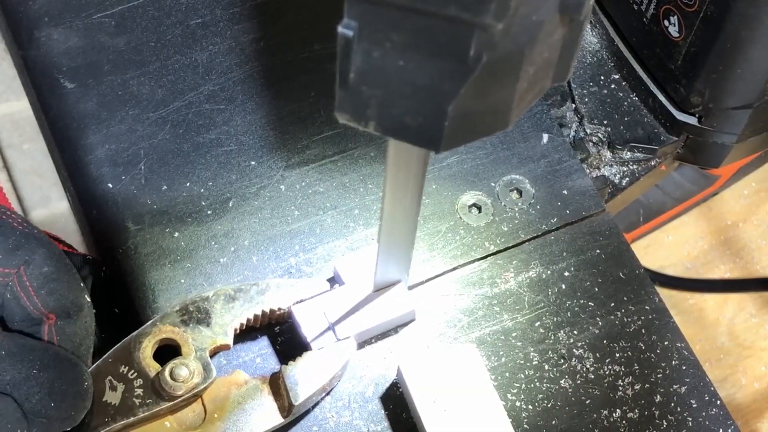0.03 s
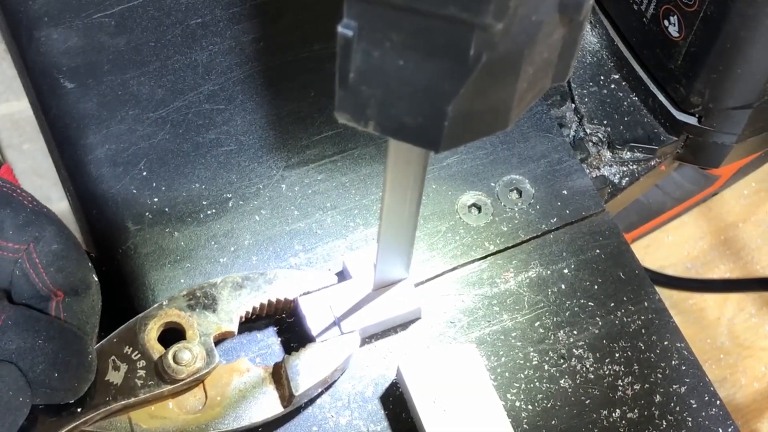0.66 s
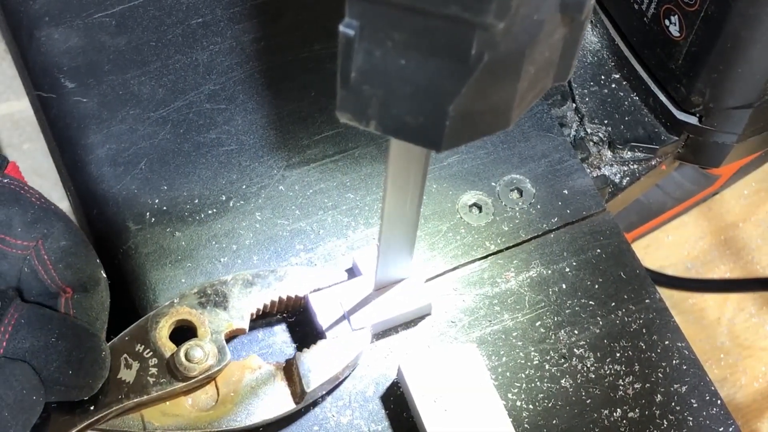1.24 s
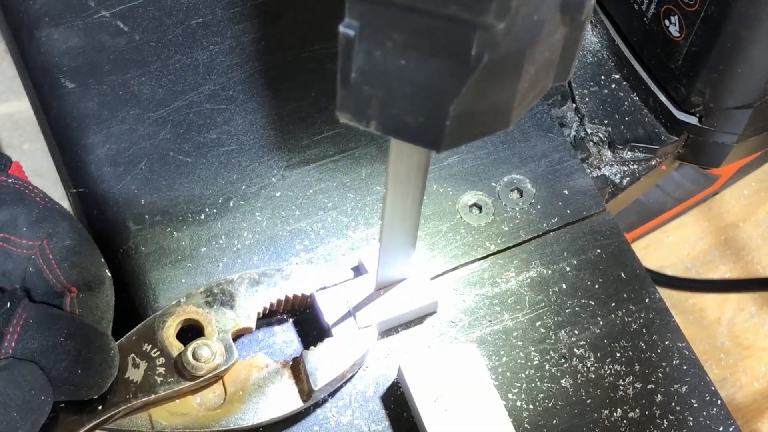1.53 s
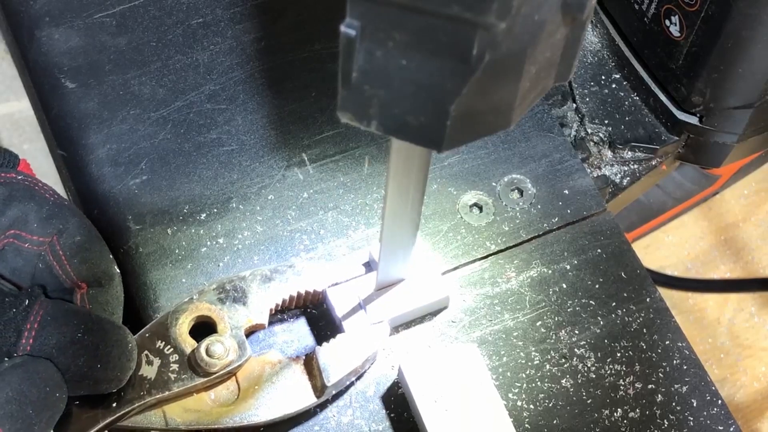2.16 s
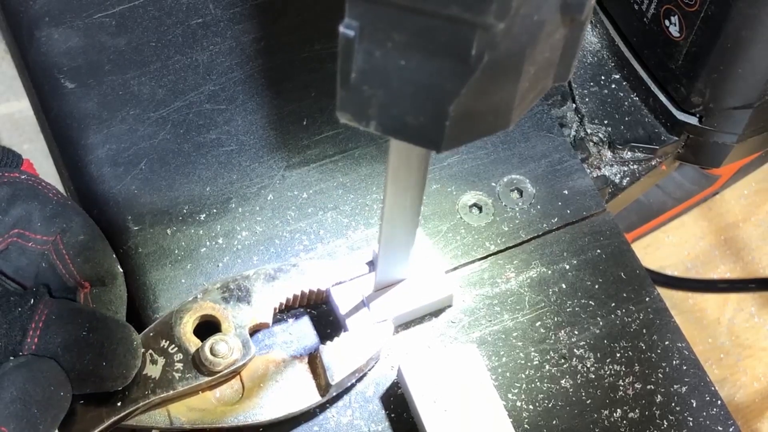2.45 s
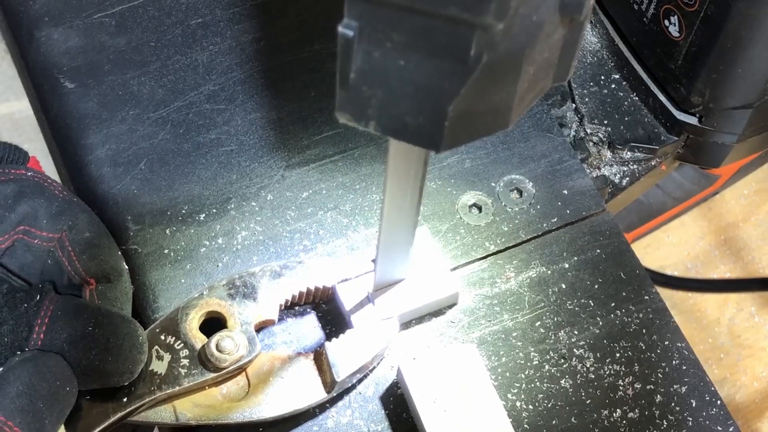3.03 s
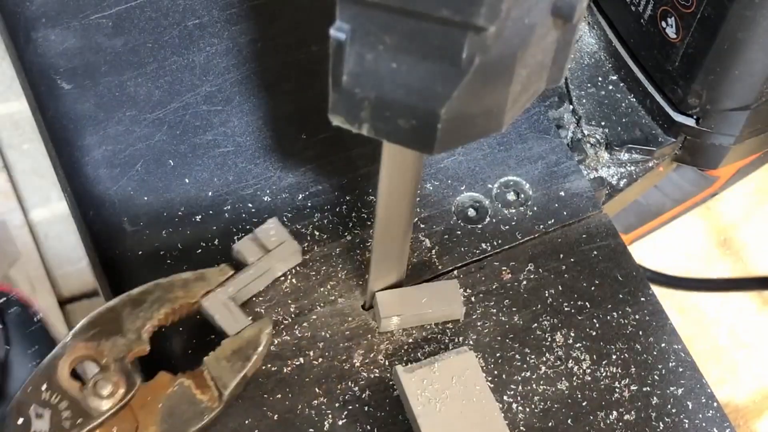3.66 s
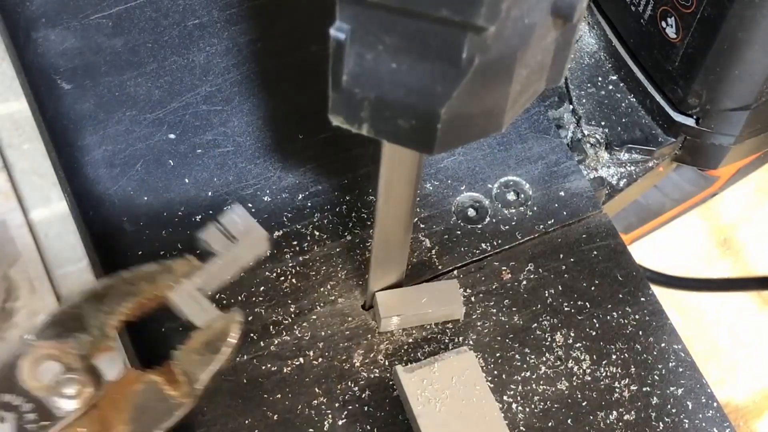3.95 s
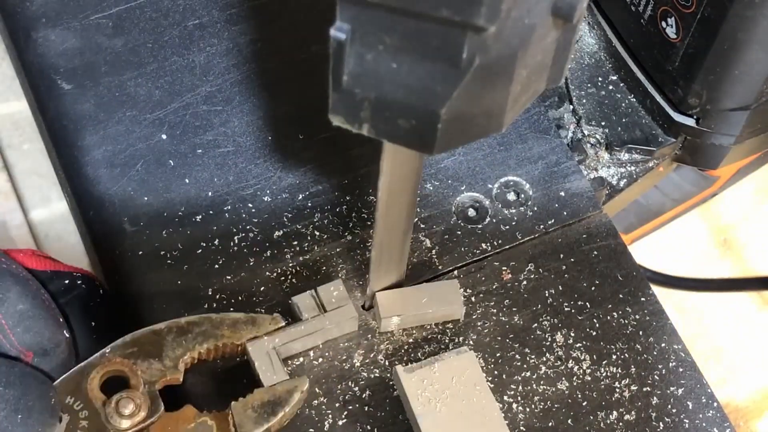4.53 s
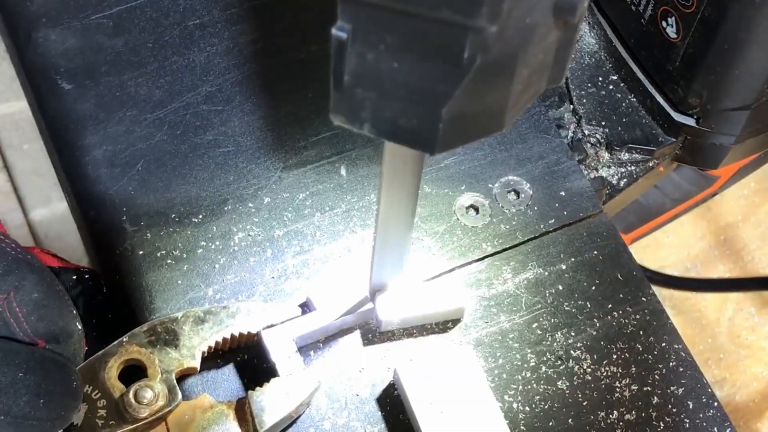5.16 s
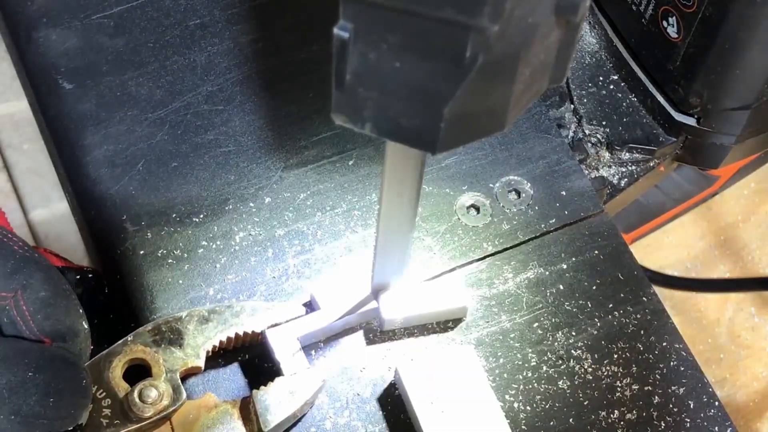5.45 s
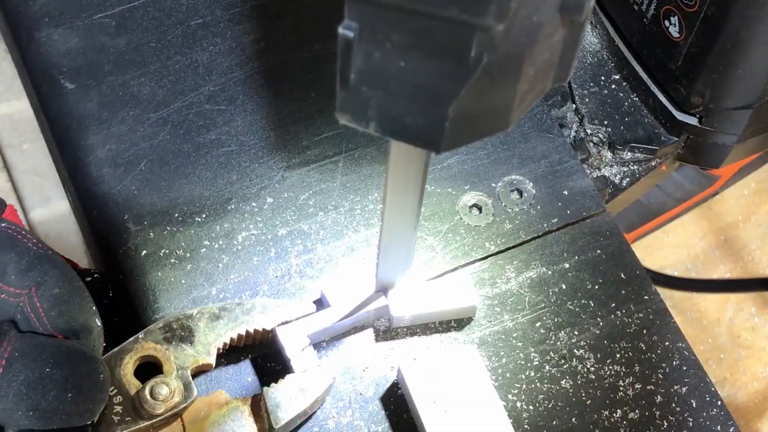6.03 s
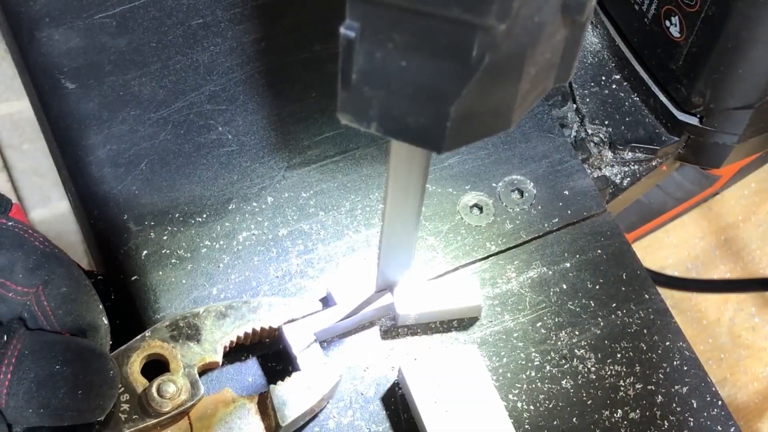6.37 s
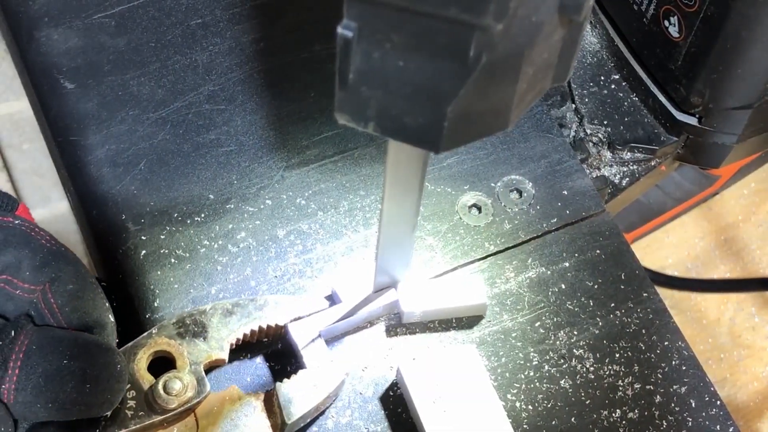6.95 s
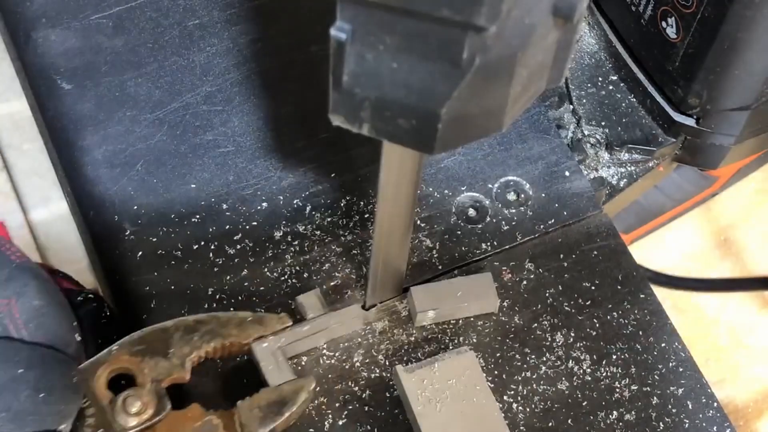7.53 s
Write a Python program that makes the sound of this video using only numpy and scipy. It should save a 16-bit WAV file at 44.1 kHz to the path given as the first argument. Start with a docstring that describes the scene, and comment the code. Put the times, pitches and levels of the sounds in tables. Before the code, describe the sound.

A band saw is already cutting a small aluminium piece, close to the microphone in a workshop. The blade makes a steady, hissing rasp, with a very high motor whistle and a fluttering gear whine. The piece knocks lightly on the steel table, and the teeth catch in short, hoarse chirps. At about 3.3 seconds the power is let go and the drive coasts almost to rest, rattling and squealing. Between 3.6 and 4.3 seconds the piece thuds softly as pliers turn it. At 4.6 seconds the saw restarts with a jolt, a loud surge and a climbing whine. From around 5 seconds it cuts steadily again, with more chirps and a couple of knocks. At 7.4 seconds it is released once more, and the slack gears howl briefly, then rattle as they slow until the end, near 8 seconds.

```python
"""A portable band saw stands upright under a steel table, close to the microphone. It is cutting a
small aluminium piece: the blade rasps, the motor whistles, the gears whine, the piece knocks and teeth
chirp. At 3.3 s the trigger is let go; the drive coasts almost to rest, rattling and squealing, while
pliers turn the piece with soft thuds. At 4.6 s it restarts with a jolt and a climbing whine and cuts
again. At 7.4 s it is let go once more and the slack gears howl."""
import sys
import numpy as np
from scipy import signal
from scipy.fft import rfft, irfft
from scipy.io import wavfile
from scipy.ndimage import uniform_filter1d

SR = 44100
rng = np.random.default_rng(int(sys.argv[2]) if len(sys.argv) > 2 else 0)


def pcm_store(signal):
    """Save signal as 16-bit PCM."""
    levels = np.round(np.clip(np.atleast_2d(signal), -1, 1) * 32767)
    wavfile.write(sys.argv[1], SR, levels.astype(np.int16).T)


N = 343980
T = np.arange(N) / SR
HZ = np.linspace(1, SR / 2, 8192)
FULL_HZ, WHISTLE_ORDER = 520, 29  # nominal shaft speed; whistle cycles per turn


def undb(db):
    """Decibels to gain."""
    return 10 ** (np.asarray(db) / 20)


def unit(x):
    """Scale to rms 1."""
    return x / np.sqrt(np.mean(x ** 2) + 1e-20)


def curve(rows):
    """Join (time, value) rows by straight lines."""
    return np.interp(T, *np.transpose(rows))


def walk(rate):
    """Random levels, rate a second, joined by straight lines; rms 1."""
    points = rng.standard_normal(int(rate * N / SR) + 2)
    return unit(np.interp(T * rate, np.arange(len(points)), points))


def bell(hz, width):
    """Power response of one resonance."""
    return 1 / (1 + (2 * (HZ - hz) / width) ** 2)


def shape(x, gain):
    """Filter x by a gain given over HZ."""
    return irfft(rfft(x) * np.interp(np.linspace(0, SR / 2, N // 2 + 1), HZ, gain), N)


def colour(x, spectrum, body_db):
    """Shape x by a spectrum and resonances; about rms 1 in the band that carries the rasp."""
    hz, db = np.transpose(spectrum)
    gain = undb(np.interp(np.log(HZ), np.log(hz), db) + body_db)
    band = (HZ > 1200) & (HZ < 9000)
    return shape(unit(x), gain / np.sqrt(np.mean(band * gain ** 2)))


def response(hz, modes):
    """Amplitude of a tone at hz as it passes through resonances."""
    return np.interp(hz, HZ, sum(undb(db) * bell(centre, width) for centre, width, db in modes))


def narrow(hz, width):
    """A resonance kept ringing by random pushes, with no deep bass; rms 1."""
    return unit(shape(rng.standard_normal(N), bell(hz, width) / (1 + (75 / HZ) ** 6)))


def swell(s, sigma):
    """The samples around a moment and a bell-shaped envelope over them."""
    span = slice(max(int((s - 4 * sigma) * SR), 0), int((s + 4 * sigma) * SR))
    return span, np.exp(-.5 * ((T[span] - s) / sigma) ** 2)


def bumps(rows, sigma):
    """Short tone swells from (t/s, f/Hz, level/dB) rows."""
    out = np.zeros(N)
    for s, hz, db in rows:
        span, envelope = swell(s, sigma)
        out[span] += undb(db) * envelope * np.sqrt(2) * np.sin(2 * np.pi * hz * (T[span] - s))
    return out


def ring(x, t60, wet_db):
    """Add the short ring of steel plate and nearby walls; its colour shifts as blade and hand move."""
    t = T[:SR // 6]
    tails = rng.standard_normal((2, len(t))) * np.exp(-np.log(1000) * t / t60)
    one, other = (signal.oaconvolve(x, tail / np.linalg.norm(tail))[:N] for tail in tails)
    drift = 2 * np.pi * T + walk(3)
    wet = np.cos(drift) * one + np.sin(drift) * other
    return (x + undb(wet_db) * wet) / np.sqrt(1 + undb(2 * wet_db))


# trigger held: on t/s, off t/s
TRIGGER_HELD = [(-2, 3.27), (4.63, 7.42)]
# motor speed as the pitch of its whistle, one list per cut: t/s, f/Hz
WHISTLE_PITCH = [
    [(0.0, 14900), (0.44, 15140), (2.27, 14910), (3.16, 15180), (3.27, 15310)],
    [(5.3, 15500), (6.5, 14970), (7.24, 15210), (7.42, 15430)],
]
def motor_speed():
    """Shaft Hz: runs up while the trigger is held, then coasts against friction and fan drag."""
    run_up_s, run_up_shape = .074, .75  # exponent under 1: torque drops with speed
    friction_hz_per_s, drag_hz = 255, 414  # fan drag equals friction at drag_hz
    hz = np.zeros(N)
    for (on, off), pitch in zip(TRIGGER_HELD, WHISTLE_PITCH):
        cutting = curve(pitch) / WHISTLE_ORDER
        lag = np.exp(-(np.maximum(T - on, 0) / run_up_s) ** run_up_shape)
        hz = np.where(T >= on, cutting + (np.interp(on, T, hz) - cutting) * lag, hz)
        braking = np.maximum(T - off, 0) * friction_hz_per_s / drag_hz
        angle = np.arctan(np.interp(off, T, hz) / drag_hz) - braking
        hz = np.where(T >= off, drag_hz * np.tan(np.maximum(angle, 0)), hz)
    return np.maximum(hz, 5)


def since_restart():
    """Seconds since the trigger was pulled again; 0 before."""
    return np.maximum(T - TRIGGER_HELD[-1][0], 0)


def strain(seconds):
    """Strain on the drive: 1 at the restart, holding and then dying away."""
    age = since_restart()
    return (age > 0) * np.exp(-(age / seconds) ** 3)


# how hard the piece is fed into the blade: t/s, rasp level/dB
FEED_LEVEL = [(0, -37.5), (.33, -37), (.77, -38.5), (1.3, -37), (2.4, -37.5), (3.27, -38), (4.95, -38.5),
              (5.1, -39), (5.25, -36), (5.5, -36.5), (5.8, -38), (6.9, -37.5), (7.2, -37)]
def rasp_level(shaft_hz, power):
    """Level in dB: set by feed and restart surge under power, by speed when coasting."""
    surge_db, attack_s = 11, .048
    coast_db, fan_db, floor_db = -43.5, 6, -53.5
    rise = np.sin(np.pi / 2 * np.minimum(since_restart() / attack_s, 1)) ** 2
    attack = np.where(T > TRIGGER_HELD[-1][0] - attack_s, rise, 1)
    driven = attack * undb(curve(FEED_LEVEL) + surge_db * strain(.21))
    free = above(shaft_hz, edge_hz=81.2) * undb(coast_db + fan_db * (shaft_hz / FULL_HZ) ** 5)
    energy = power * driven ** 2 + (1 - power) * free ** 2 + undb(floor_db) ** 2
    return 10 * np.log10(energy) + .21 * walk(10)


def above(hz, edge_hz, steepness=5):
    """Gain of 1 well above edge_hz, fading under it."""
    return 1 / np.sqrt(1 + (edge_hz / hz) ** steepness)


def scrape(grain_db, spread_db):
    """Hiss of sliding steel plus tiny impacts of teeth and chips, too dense to tell apart."""
    count = 40000
    sizes = rng.choice([-1, 1], count) * undb(spread_db * np.minimum(rng.exponential(size=count), 3))
    impacts = np.bincount(rng.integers(0, N, count), sizes, N)
    return rng.standard_normal(N) + undb(grain_db) * unit(impacts)


def flaws(turns):
    """A gear meets the same flaws each turn, never quite alike: its harmonics trade strength."""
    count = 128
    place = turns * count % count
    weights = np.array([walk(16) for _ in range(3)])
    patterns = [np.interp(place, np.arange(count), rng.standard_normal(count)) for _ in weights]
    return np.sum(weights * patterns, axis=0) / np.linalg.norm(weights, axis=0)


# resonances of housing, frame and table, negative for hollows: f/Hz, width/Hz, gain/dB
BODY_MODES = [(254, 22.5, 7.5), (415, 60, 3.5), (611.5, 41, 6.5), (705, 143, -9.5), (1306, 66, 3.5),
              (1810, 37, 4), (1940, 40, 1), (2670, 99, -4), (2886, 110, 2.5), (3430, 100, -0.5),
              (3520, 210, 1), (4130, 320, -2), (4570, 370, 3), (5820, 120, 2.5), (6030, 130, 2),
              (6200, 95, 2.5), (7470, 120, 5), (7830, 180, -4), (8040, 160, 4), (9070, 540, -2.5),
              (10090, 540, 4), (11350, 230, 1)]
# colour of the rasp under power: f/Hz, gain/dB
DRIVEN_SPECTRUM = [(30, -41), (60, -30.5), (110, -17.5), (170, -10.5), (230, -3.5), (320, -2.5), (560, 1),
                   (850, -1), (1600, -1.5), (3200, -0.96), (6500, -1.97), (9000, -5.5), (13500, -10.5),
                   (15500, -17)]
# its colour while the motor pulls up to speed: f/Hz, gain/dB
PULLING_SPECTRUM = [(30, -31), (60, -38), (110, -15.5), (400, -3.5), (1100, 1), (1700, -2.5), (4000, -1),
                    (7500, -5.5), (12000, -12), (15500, -22)]
def rasp(shaft_hz, turns, power):
    """The blade scrapes in guides and cut, gives way to rattle as it slows, and restarts coarsely."""
    body_db = sum(db * bell(hz, width) for hz, width, db in BODY_MODES)
    speed = np.clip(shaft_hz / FULL_HZ, 0, 1)
    pull = power * np.clip((1 - speed - .04) * 7, 0, 1)
    fast = np.maximum(power, speed ** 2.6)
    sliding = ring(scrape(grain_db=-5, spread_db=3), t60=.087, wet_db=-14)
    whirr = shape(flaws(turns / 5), bell(hz=3300, width=1400))  # a slower gear excites the gearbox
    driven = colour(unit(sliding) + undb(-15) * unit(whirr), DRIVEN_SPECTRUM, body_db)
    driven *= undb(.29 * walk(45))
    # the blade wanders in the cut, so the metal's bands take turns in speaking
    for hz, width in [(520, 1200), (1900, 1300), (3200, 510), (4550, 670), (6150, 1350), (8500, 3500)]:
        driven += shape(driven, bell(hz, width)) * .14 * walk(32)
    coasting = rattle(turns, body_db) * undb(.37 * walk(70))
    coarse = ring(scrape(grain_db=-3, spread_db=2.5), t60=.037, wet_db=-5)
    pulling = colour(coarse, PULLING_SPECTRUM, body_db)
    running = np.sqrt(fast) * undb(-1.16) * driven + np.sqrt(1 - fast) * undb(-.96) * coasting
    return np.sqrt(1 - pull) * running + np.sqrt(pull) * undb(.56) * pulling


# tones of armature, fan and pinion: shaft multiple, relative level/dB
SHAFT_TONES = [(1, -64), (2, -51.3), (3, -61.5), (4, -58), (6, -59), (12, -57.5), (24, -72), (28, -62)]
# the blade bites harder: t/s, boost/dB, sigma/s
BLADE_BITES = [(6.3, 5, .03), (7.2, 3, .1)]
def gear_whine(turns, shaft_hz, power, rasp_db):
    """Shaft harmonics flutter with the play in the gears, grow with load and speed, fade unpowered."""
    tones = np.zeros(N)
    for order, db in SHAFT_TONES:
        angle = 2 * np.pi * order * turns + .37 * walk(45)
        tones += undb(db) * np.sqrt(2) * (1 + .21 * walk(45)) * np.sin(angle)
    load_db = .75 * np.minimum(rasp_db + 41, 4) + 1.7 * walk(20)
    speed_db = np.clip(.1 * (shaft_hz - FULL_HZ), -1, 2)
    restart_db = 1.5 * strain(.57) + 1.5 * (since_restart() > 0)
    bite_db = sum(db * np.exp(-.5 * ((T - s) / sigma) ** 2) for s, db, sigma in BLADE_BITES)
    tones *= undb(load_db + speed_db + restart_db + bite_db - 3 - 17 * (1 - power))
    return shape(tones, 1 / (1 + (230 / HZ) ** 4))  # the small housing radiates no deep bass


# high resonances of the motor housing: f/Hz, width/Hz, level/dB
HOUSING_MODES = [(9920, 650, -48.5), (11840, 390, -43), (13565, 860, -45.5), (14830, 580, -43),
                 (15210, 250, -43)]
def motor_whistle(turns, shaft_hz):
    """A very high harmonic swells in the housing's resonances and flutters more below full speed."""
    slowed = np.clip(3 * (1 - shaft_hz / FULL_HZ), 0, 1)
    tone = np.sqrt(2) * np.sin(2 * np.pi * WHISTLE_ORDER * turns + slowed * walk(260))
    strain_db = 9 * strain(.53) + 7.5 * strain(.08)  # loudest in the restart's first surge
    flutter_db = (1.6 + 2.8 * slowed) * np.clip(walk(170), -2, 1.5)
    level_db = strain_db + flutter_db + .69 * walk(2.82) + .18
    return tone * response(WHISTLE_ORDER * shaft_hz, HOUSING_MODES) * undb(level_db)


# clear knocks of the piece: t/s, level/dB
PIECE_KNOCKS = [(.189, -50), (.336, -44), (1.16, -51), (1.775, -46.5), (2.72, -47), (6.385, -48),
                (6.74, -46)]
def table_knocks(power):
    """During the cuts the piece knocks on the table, often faintly, and sounds one low mode."""
    table_hz = 262.7
    faint = [(N / SR * when, -59 + 3 * force) for when, force in rng.random((12, 2))]
    return power * bumps([(s, table_hz, db) for s, db in list(PIECE_KNOCKS) + faint], sigma=.014)


# the teeth catch: t/s, f/Hz, level/dB, sigma/s
TOOTH_CHIRPS = [(.32, 6180, -39, .035), (.61, 1790, -44, 0.022), (.69, 1280, -47, 0.026),
                (.71, 520, -42, .016), (.84, 1291, -48, .02), (.94, 1326, -42, 0.021),
                (1.615, 1960, -41, .014), (1.78, 6090, -42, 0.035), (1.855, 1787, -40, 0.016),
                (2.59, 1606, -42, 0.041), (3.1, 2820, -40, .034), (5.18, 4069, -42, 0.019),
                (5.28, 6470, -40, .016), (5.3, 3273, -40, 0.018), (5.58, 516, -42, 0.014),
                (6.25, 1250, -46, 0.02), (6.76, 6976, -43, .02), (6.92, 624, -47, 0.034),
                (7.1, 2088, -43, 0.041), (7.12, 2540, -42, 0.016), (7.22, 2605, -44, .018)]
def tooth_chirps(power):
    """Teeth stick and chatter for a moment: a few hoarse chirps among many faint ones."""
    faint = [(N / SR * when, 900 * 9 ** pitch, -54 + 7 * force, .024 + .016 * length)
             for when, pitch, force, length in rng.random((150, 4))]
    chatter = walk(300) + 1j * walk(300)
    out = np.zeros(N)
    for s, hz, db, sigma in list(TOOTH_CHIRPS) + faint:
        span, envelope = swell(s, sigma)
        tone = np.real(chatter[span] * np.exp(2j * np.pi * hz * T[span])) / np.sqrt(2)
        out[span] += undb(db) * envelope * tone
    return out * power


# colour of the coasting drive: f/Hz, gain/dB
COASTING_SPECTRUM = [(30, -43), (80, -21), (140, -7), (250, -4.5), (450, -4), (650, 4), (1500, -5.5),
                     (2100, 1), (5000, -4.5), (8000, -4.5), (10000, -9), (12500, -15.5), (15500, -25)]
# resonances of the free-running blade: f/Hz, width/Hz, gain/dB
LOOSE_MODES = [(1930, 85, 3), (3070, 100, 5), (4570, 170, 3.5), (5170, 520, 6.5), (5950, 150, -1),
               (8000, 130, 0)]
def rattle(turns, body_db):
    """Unloaded gears slide and whirr, and the slack blade clatters unevenly in its guides."""
    whirr = shape(flaws(turns), HZ / np.hypot(HZ, 1200))  # small flaws tick and give little bass
    sliding = ring(scrape(grain_db=-8, spread_db=2.5), t60=.063, wet_db=-6)
    count = int(90 * N / SR)  # 90 taps a second
    taps = np.bincount(rng.integers(0, N, count), rng.uniform(-.74, 1, count), N)
    clatter = ring(taps, t60=.025, wet_db=12)
    loose_db = sum(db * bell(hz, width) for hz, width, db in LOOSE_MODES)
    mix = unit(sliding) + undb(-11) * unit(whirr) + undb(-9) * unit(clatter)
    return colour(mix, COASTING_SPECTRUM, body_db + loose_db)


# slack gear harmonics: shaft multiple, gain/dB, slowest shaft f/Hz, fastest shaft f/Hz
SLACK_HARMONICS = [(2, -9, 420, 600), (3, -3, 270, 600), (6, -6.5, 72, 125), (12, 3, 400, 470),
                   (12, -2, 72, 115), (24, 4.3, 77, 280), (47.7, 3.5, 102, 140)]
# resonances of the frame: f/Hz, width/Hz, level/dB
FRAME_MODES = [(645, 110, -40), (930, 190, -49.5), (1363, 240, -50), (1980, 300, -45), (3100, 600, -50.5),
               (3930, 400, -52), (4650, 600, -53), (5300, 520, -47), (6300, 240, -49.5), (8070, 540, -50)]
def gear_squeals(turns, shaft_hz, power):
    """Coasting, each harmonic chatters in its own range of speed and sings in the frame."""
    out = np.zeros(N)
    for order, db, slowest_hz, fastest_hz in SLACK_HARMONICS:
        in_range = above(shaft_hz, slowest_hz, steepness=12) * above(fastest_hz, shaft_hz, steepness=12)
        flutter = unit(undb(4.2 * np.minimum(walk(110), 1)) * (1 + .4 * walk(450)))
        angle = 2 * np.pi * order * turns + .13 * np.sqrt(order) * walk(180)
        out += undb(db) * in_range * flutter * response(order * shaft_hz, FRAME_MODES) * np.sin(angle)
    return ring(out * (1 - power), t60=.094, wet_db=-5)


# howls after the trigger is let go: t/s, level/dB, length/s
RELEASE_HOWLS = [(3.31, -55, .15), (7.465, -49.5, .21)]
def gear_howl(turns):
    """The gears go slack and howl briefly on the shaft's falling third harmonic."""
    attack_s, release_s = .012, .07
    gate = sum(undb(db) * np.clip((T - s) / attack_s, 0, 1) * np.clip((s + length - T) / release_s, 0, 1)
               for s, db, length in RELEASE_HOWLS)
    flutter = unit(1 + .5 * walk(150))
    return gate * np.sqrt(2) * flutter * np.sin(2 * np.pi * 3 * turns + .75 * walk(150))


# handling between the cuts: t/s, f/Hz, level/dB
PLIER_THUDS = [(3.61, 283, -54.5), (3.75, 148, -55.5), (3.989, 336, -48.5), (4.04, 154, -56.5),
               (4.07, 255, -54), (4.25, 190, -61)]
def plier_thuds():
    """The piece thuds softly as the pliers draw it back and turn it."""
    return bumps(PLIER_THUDS, sigma=.022)


# brief dips of the rasp: t/s, gain below the treble/dB, half length/s
RASP_DIPS = [(3.705, -2.5, .012), (4.393, -4, .015), (4.957, -3.5, .009), (5.279, -2, .009),
             (7.635, -4, .013)]
def dips(x):
    """Now and then the level dips briefly, the treble three times as many decibels."""
    treble = x - shape(x, 1 / (1 + (HZ / 7500) ** 4))
    dip_db = sum(db * np.exp(-((T - s) / half) ** 4) for s, db, half in RASP_DIPS)
    return (x - treble + treble * undb(2 * dip_db)) * undb(dip_db)


def restart_jolt():
    """Inrush current shakes frame and table at twice mains frequency; the gears take up their play."""
    age = since_restart()
    kick = (1 - np.exp(-(age / .016) ** 2)) * np.exp(-(age / .048) ** 2)
    hum = undb(-35.5) * np.sin(2 * np.pi * 120 * T)
    rise = 1 - np.exp(-(age / .031) ** 2)
    shudder = rise * strain(.1) * undb(-38) * narrow(hz=251, width=56)
    thump = undb(-43) * narrow(hz=108, width=32)
    clunk = undb(-33.5) * narrow(hz=423, width=800)
    return shudder + kick * (hum + thump + clunk)


# gear tones of the run-up: peak t/s, shaft multiple, level/dB, sigma/s
CLIMBING_TONES = [(4.69, 24, -44, .02), (4.72, 12, -43, .035), (4.79, 3, -45, .065), (4.79, 2, -47, .025)]
def run_up_whine(turns):
    """The straining gears sing a few climbing tones; a hoarse whine lasts until the cut is steady."""
    hoarse = np.sin(2 * np.pi * 6.4 * turns + 1.8 * walk(190)) * unit(1 + .5 * walk(140))
    out = undb(-48) * strain(.9) * hoarse
    for s, order, db, sigma in CLIMBING_TONES:
        span, envelope = swell(s, sigma)
        flutter = unit(1 + .45 * walk(120))
        tone = flutter * np.sin(2 * np.pi * order * turns + .35 * np.sqrt(order) * walk(150))
        out[span] += undb(db) * envelope * tone[span]
    return np.sqrt(2) * out


def scene():
    """The saw from close by: one trigger and one motor speed drive all its parts."""
    held = sum((T > on) * (T < off) * 1. for on, off in TRIGGER_HELD)
    power = uniform_filter1d(held, SR // 50).clip(0, 1)
    shaft_hz = motor_speed()
    ripple = np.sin(2 * np.pi * np.cumsum(shaft_hz / 63) / SR)  # load on the gearbox's slow side
    turns = np.cumsum(shaft_hz * (1 + .00099 * ripple + .00028 * walk(20))) / SR
    rasp_db = rasp_level(shaft_hz, power)
    saw = dips(rasp(shaft_hz, turns, power) * undb(rasp_db + .072 * ripple))
    saw += gear_whine(turns, shaft_hz, power, rasp_db) + motor_whistle(turns, shaft_hz)
    saw += table_knocks(power) + tooth_chirps(power)
    saw += gear_squeals(turns, shaft_hz, power) + gear_howl(turns) + plier_thuds()
    saw += restart_jolt() + run_up_whine(turns)
    return np.array([saw, saw])


def record(dry):
    """Close mono sound, with the treble cut steeply above 15.7 kHz."""
    return signal.sosfilt(signal.ellip(10, .2, 80, 15700, fs=SR, output="sos"), dry)


dry = scene()
out = record(dry)
pcm_store(out)
```